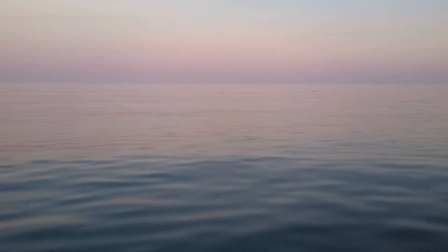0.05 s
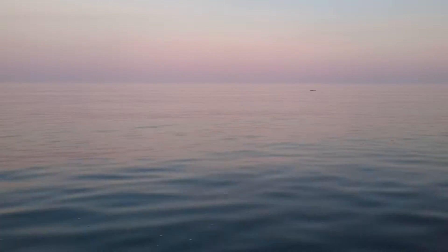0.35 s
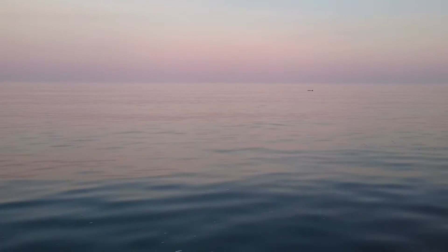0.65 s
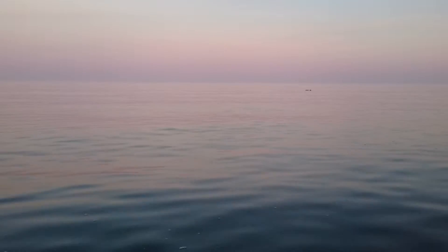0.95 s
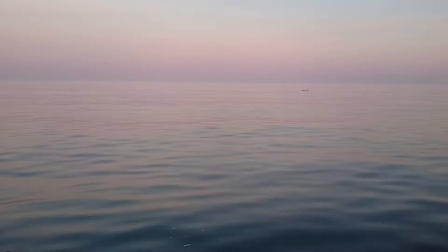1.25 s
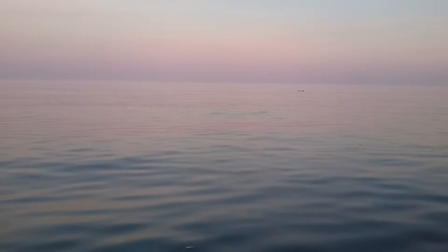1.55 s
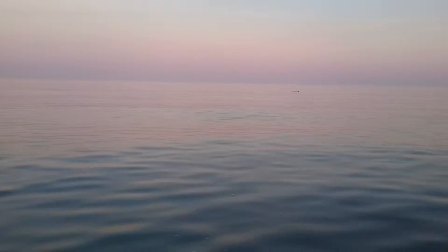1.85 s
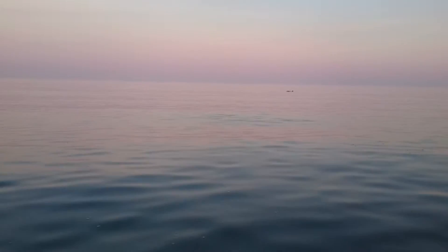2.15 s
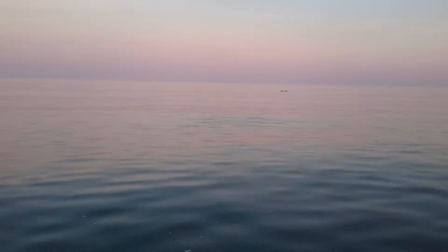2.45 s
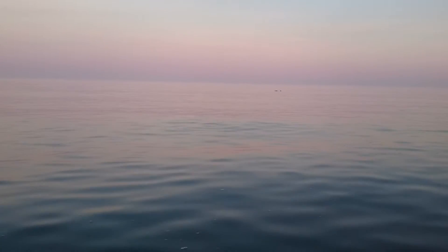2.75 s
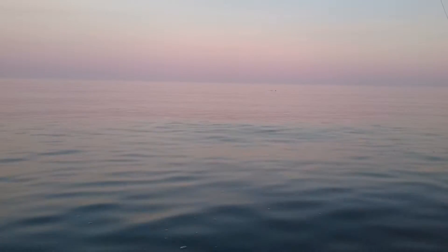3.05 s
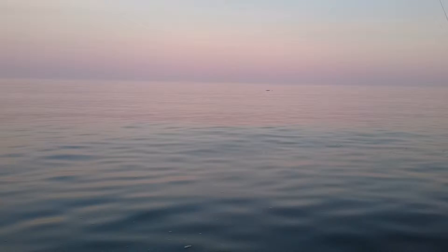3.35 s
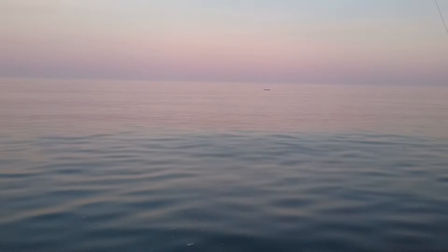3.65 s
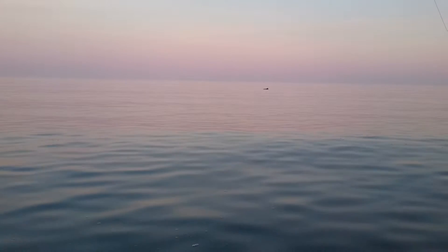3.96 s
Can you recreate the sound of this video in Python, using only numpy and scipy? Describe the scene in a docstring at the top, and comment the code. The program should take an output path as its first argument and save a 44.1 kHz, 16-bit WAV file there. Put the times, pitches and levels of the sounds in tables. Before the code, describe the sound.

A small sea wave washes ashore, fizzing on the left and fading after about 0.6 seconds. From around 1 second the wash runs on toward the right, gurgling and crackling with a fine foam hiss, fullest between 1.3 and 2.3 seconds, then slowly ebbing until 4 seconds. Single bubbles plop and droplets tick throughout, over a faint distant rumble with a few soft, low bumps.

```python
"""A small wave fizzes out on the left, on the shore of a calm sea; its wash runs on to the right,
gurgling and slowly ebbing. Each wash is a swarm of ringing bubbles on a bed of noise: large ones
gurgle, smaller ones crackle, the finest hiss as foam. Single bubbles plop and droplets tick over a
faint, distant rumble with a few soft bumps.
The two microphone channels are of opposite polarity, so the bass is very wide."""
import sys
import numpy as np
from scipy import signal
from scipy.fft import rfft, irfft, next_fast_len
from scipy.io import wavfile
from scipy.ndimage import uniform_filter1d, map_coordinates

SR = 44100
rng = np.random.default_rng(int(sys.argv[2]) if len(sys.argv) > 2 else 0)


def bounce(signal):
    """Save signal as a 16-bit WAV file at the path given by the first command-line argument."""
    frames = np.transpose(np.atleast_2d(signal))
    limited = np.clip(frames, -1, 1)
    pcm = np.round(limited * 32767).astype(np.int16)
    wavfile.write(sys.argv[1], SR, pcm)


N = 176400

# colour of the right wash at the microphones (frequency [Hz], left gain [dB], right gain [dB])
RIGHT_COLOUR = [(99, -47, -38), (333, -10.5, -12.5), (557, 2, -4.5), (1013, -3, -4), (1210, -10, -5.5),
                (1830, -14, -5.5), (2190, -10.5, -12), (3000, -18.5, -15), (3740, -16.5, -14.5),
                (4100, -27.5, -20), (5050, -36, -20.5), (6120, -32, -14), (9150, -36, -27),
                (11900, -47, -40), (13000, -39, -41), (15200, -48, -38.5)]
# direction of the right wash (frequency [Hz], phase lead of the left channel [rad])
RIGHT_LEAD = [(100, 2), (450, 3.5), (700, 1), (1000, -0.83), (1400, -2.5), (1750, -6.5), (2400, -9),
              (3000, -13.5), (4000, -14.5)]
# likeness of the two channels in the right wash (frequency [Hz], coherence [0-1])
RIGHT_COHERENCE = [(300, 0.78), (900, 0.79), (1400, 0.85), (2000, 0.32), (4000, 0.34), (6000, 0.041)]


def left_wash():
    """On the left a wave has tipped over: dense small bubbles swell, hold and fizz out."""
    # colour at the microphones (frequency [Hz], left gain [dB], right gain [dB])
    colour = [(97, -23.5, -18.5), (304, -8.5, -6.5), (597, -2, -5.5), (870, -9, -3), (1290, -6, -2),
              (1790, 0, -5), (2300, -3.2, -5), (2710, -3.5, -12), (3810, -6, -12), (5200, -26.5, -14),
              (5970, -26.5, -9.5), (8360, -29, -20), (11560, -44.5, -37.5), (15500, -45, -37.5)]
    # direction (frequency [Hz], phase lead of the left channel [rad])
    lead = [(100, 3), (450, 3.4), (850, 0.62), (1300, 0.23), (1900, 1.32), (2500, 2.32), (4000, 2.63),
            (6000, 7.75)]
    # likeness of the two channels (frequency [Hz], coherence [0-1])
    coherence = [(300, 0.95), (1000, 0.73), (2400, 0.69), (3200, 0.29), (4200, 0.66), (7000, 0.066)]
    crest_db, rise_db, crest_s, hold_s, fall_db_per_s = -40, 1.5, 0.23, 0.36, 8.5
    t = np.arange(N) / SR
    swell_db = -rise_db * np.maximum(1 - t / crest_s, 0)
    fade_db = -fall_db_per_s * np.maximum(t - crest_s - hold_s, 0)
    bubbles = froth(hz=(504, 9030), cycles=14, spread_db=3.8, rise=0.035, noise_db=6, count=7000, size=200)
    fizz = placed(patchy(bubbles, depth_db=0.9), colour, lead, coherence)
    return amp(crest_db + swell_db + fade_db) * (fizz + amp(-23) * tinkle())


def right_wash():
    """The wash runs on along the shore: gurgle in the lows, spray in the middle, foam on top."""
    # spray and foam run out to the right, then drift back (time [s], left minus right [dB])
    drift = [(0, 1), (2, 0.5), (2.5, -1.5), (2.8, -0.5), (3.3, 1), (3.9, 1)]
    gurgle_top_hz, foam_from_hz = 1050, 4650
    low = lambda hz: np.sqrt(rolloff(hz, gurgle_top_hz))
    high = lambda hz: np.sqrt(1 - rolloff(hz, foam_from_hz))
    middle = lambda hz: np.sqrt(np.abs(1 - low(hz) ** 2 - high(hz) ** 2))
    return gurgle(low) + panned(curve(drift)) * (spray(middle) + foam(high))


def gurgle(band):
    """Large bubbles gurgle, bright as the wash runs up and deeper as it ebbs."""
    # swell and ebb of the gurgle (time [s], level [dB])
    level = [(0, -54.5), (.4, -56), (.9, -52), (1.25, -48), (1.43, -46.5), (1.58, -49.5), (1.85, -48.5),
             (1.93, -48.5), (2.02, -44.5), (2.1, -46), (2.2, -47.5), (2.45, -48.5), (2.8, -50), (3, -50),
             (3.25, -51), (3.6, -50.5), (3.76, -51.5), (3.86, -53.5), (4, -54.5)]
    # extra gain on its smaller bubbles (time [s], gain [dB])
    brightness = [(0, 5), (1, -4), (1.7, 4.6), (2.4, 0.5), (3.6, -3.3)]
    large = froth(hz=(439.6, 1440), cycles=14.6, spread_db=1.5, rise=0.23, noise_db=0,
                  count=1400, size=1500)
    bubbling = on_right(large, band)
    upper = filtered(bubbling, lambda hz: 1 - rolloff(hz, corner_hz=950))
    lower = bubbling - upper
    return amp(curve(level) + 0.26 * wobble(21.9)) * (lower + amp(curve(brightness)) * upper)


def spray(band):
    """Smaller bubbles crackle in clouds, and a few tinkle on."""
    # surges of the spray (time [s], level [dB])
    level = [(0, -54), (.25, -46.5), (.55, -52.5), (.9, -49.5), (1.2, -47), (1.55, -46.5), (1.85, -48),
             (2, -47), (2.22, -48), (2.4, -50), (2.65, -50.5), (2.9, -51.5), (3.25, -51), (3.35, -49),
             (3.63, -51.5), (3.78, -54), (4, -52.5)]
    small = froth(hz=(1005, 4410), cycles=16.3, spread_db=-0.5, rise=0.14, noise_db=3,
                  count=2000, size=450)
    crackle = on_right(patchy(small, depth_db=1.2), band)
    return amp(curve(level) + 0.29 * wobble(22.7)) * (crackle + amp(-14.5) * tinkle())


def foam(band):
    """The finest bubbles merge into a hiss."""
    # surges of the hiss (time [s], level [dB])
    level = [(0, -57.5), (1.25, -62), (1.55, -55.5), (1.9, -57), (2.12, -57), (2.2, -55), (2.29, -57.5),
             (2.45, -58.5), (2.62, -60), (2.74, -60), (2.85, -61), (3.26, -61.5), (3.33, -58), (3.42, -60),
             (3.66, -60), (3.76, -62.5), (4, -62)]
    finest = froth(hz=(4050, 11000), cycles=23, spread_db=2.5, rise=0.089, noise_db=1,
                   count=4000, size=200)
    hiss = on_right(patchy(finest, depth_db=1.0), band)
    return amp(curve(level) + 0.92 * wobble(25.14)) * hiss


def plops():
    """Single bubbles ring out; they reach the left microphone later, with opposite sign."""
    # (time [s], level [dB], pitch [Hz], ring [cycles], left minus right [dB], left lag [s])
    bubbles = [(0.339, -28, 1840, 23, 0, 0.0002), (0.932, -27, 1910, 30, -1, 0.00021),
               (1.001, -32.5, 916, 43, 1, 0.00047), (1.199, -24.5, 990, 12, -2, .00045),
               (1.208, -33, 2370, 40, 1, 0.0005), (1.406, -31, 510, 20, 4, 0.00047),
               (1.881, -26.5, 930, 21, 3, .00059), (1.951, -33, 590, 26, 6, 0.00062),
               (1.953, -33, 1850, 40, 0, 0.00035), (1.978, -31, 990, 22, 1, .00059),
               (2.011, -33.5, 1016, 64, 0, 0.00051), (2.193, -31, 534, 29, 4, 0.00046),
               (2.384, -35, 540, 27, 2, .0004), (2.545, -33, 780, 25, 8, .00055),
               (2.721, -33, 950, 17, 2, .00062), (2.856, -32, 1190, 16, -4, .00064),
               (3.113, -38.5, 620, 29, 7, 0.00054), (3.312, -29, 1020, 22, -2, 0.00056),
               (3.517, -36, 2430, 40, 0, 0.0004), (3.553, -34, 707, 27, 4, 0.00044),
               (3.654, -36.5, 705, 22, 10, .00046), (3.761, -39, 610, 22, 7, 0.00046),
               (3.922, -44, 2260, 140, -2, 0.00031)]
    trim_db = -3
    out, t = np.zeros((2, N)), np.arange(SR // 12) / SR
    for start, db, hz, cycles, pan_db, lag_s in bubbles:
        left, right = panned(pan_db) * amp(db + trim_db) * bubble(t, hz, cycles, rise=0.036)
        add(out[0], start + lag_s, -left)
        add(out[1], start, right)
    return out


def droplets():
    """Droplets strike the water with a short, bright burst in the colour of the right wash."""
    # (time [s], level [dB], band centre [Hz], time to fall 60 dB [s], left minus right [dB])
    strikes = [(.6, -41, 5300, .026, 4), (.632, -27, 3000, 0.019, 8), (.72, -32.5, 4800, .026, 3),
               (0.888, -32, 4600, 0.016, -2), (1.185, -38.5, 3860, .08, 1), (1.203, -31.5, 1590, .08, 5),
               (1.42, -33.5, 1110, 0.17, 0), (1.545, -45, 7000, .04, -3), (2.139, -32, 2800, .02, 3),
               (2.208, -41, 6500, 0.056, 0), (2.44, -39.5, 3000, 0.047, -6), (2.547, -31, 1900, 0.018, -5),
               (2.752, -41, 4000, .04, 0), (2.95, -40, 3020, .045, -5), (3.117, -38.5, 4200, .022, -4),
               (3.311, -40.5, 5000, 0.031, -4), (3.349, -46, 4800, .08, 0), (3.659, -43.5, 4500, .035, 0),
               (3.736, -38.5, 3500, .02, 9), (3.847, -38.5, 2900, .022, 4)]
    width_octaves = 0.7
    out, t = np.zeros((2, N)), np.arange(SR // 8) / SR
    hz = np.fft.rfftfreq(len(t), 1 / SR)
    colour = channel_gains(RIGHT_COLOUR, hz)
    for start, db, centre_hz, t60, pan_db in strikes:
        band = colour * np.exp(-(np.log2((hz + 1) / centre_hz) / width_octaves) ** 2 / 2)
        noise = rng.standard_normal((2, len(t)))
        burst = unit(irfft(rfft(noise) * band, len(t)))
        envelope = (1 - np.exp(-t * centre_hz)) * amp(db - 60 * t / t60)
        add(out, start, panned(pan_db) * burst * envelope / 2)
    return out


def tinkle():
    """A few small bubbles ring on clearly, at rms 1."""
    rings = froth(hz=(1600, 4210), cycles=120, spread_db=1, rise=0.067, noise_db=-36, count=70, size=3500)
    return on_right(rings)


def bumps():
    """A few soft, low bumps, the same in both channels."""
    # (time [s], strength [dB], pitch [Hz])
    thuds = [(0.412, -39, 70), (1.345, -40, 62), (2.028, -37, 144), (3.186, -42, 65)]
    t60_s = 0.018
    out, t = np.zeros((2, N)), np.arange(SR // 10) / SR
    for start, db, hz in thuds:
        add(out, start, amp(db) * bubble(t, hz, cycles=t60_s * hz, rise=0))
    return out


def rumble():
    """A steady rumble in the distance, mostly of opposite sign in the two channels."""
    # (frequency [Hz], relative spectral level [dB])
    spectrum = [(20, -15), (40, -13), (57, 1), (75, -2), (110, -9.5), (170, -14.5), (300, -13), (900, -53)]
    level_db, coherence = -60, 0.89
    opposed, alike = filtered(rng.standard_normal((2, N)), lambda hz: amp(along(spectrum, hz)))
    angle = np.arccos(coherence) / 2
    return amp(level_db) * unit(np.sin(angle) * alike + np.cos(angle) * np.array([opposed, -opposed]))


def bubble(t, hz, cycles, rise):
    """A damped ring that falls 60 dB in so many cycles while its pitch climbs by the fraction rise."""
    age = t * hz / cycles
    onset = 1 - np.exp(-2 * t * hz)
    return np.sin(2 * np.pi * hz * t * (1 + rise * age / 2)) * amp(-60 * age) * onset


def froth(hz, cycles, spread_db, rise, noise_db, count, size):
    """Two unrelated swarms of bubbles, size samples each, on noise (noise_db compares the two per Hz)."""
    low_hz, high_hz = hz
    swarms = []
    for when, pitch, rarity in rng.random((2, 3, count, 1)):
        ring_hz = low_hz + (high_hz - low_hz) * pitch
        strength = np.sqrt(ring_hz) * amp(-spread_db * np.log(np.maximum(rarity, .02)))
        sign = rng.choice([-1, 1], (count, 1))
        rings = sign * strength * bubble(np.arange(size) / SR, ring_hz, cycles, rise)
        samples = (when * N).astype(int) + np.arange(size)
        swarms.append(np.bincount(samples.ravel(), rings.ravel(), N)[:N])
    band_share = (high_hz - low_hz) / (SR / 2)
    return unit(np.array(swarms)) * np.sqrt(band_share) + amp(noise_db) * rng.standard_normal((2, N))


def patchy(pair, depth_db):
    """Bubbles come in clouds: patches of random gain over pitch and time."""
    spectra = signal.stft(pair, nperseg=512)[2]
    clouds = uniform_filter1d(rng.standard_normal(spectra.shape[1:]), size=7, axis=0)
    clouds = uniform_filter1d(clouds, size=9, axis=1)
    return signal.istft(spectra * amp(depth_db * unit(clouds)), nperseg=512)[1][:, :N]


def placed(pair, colour, lead, coherence, band=np.ones_like):
    """Give two unrelated signals the colour, direction and width of a wash at the microphones, rms 1."""
    def width(hz):
        angle = np.arccos(np.clip(along(coherence, hz), 0, 1)) / 2
        return band(hz) * np.array([np.cos(angle), np.sin(angle)])

    def arrival(hz):
        return channel_gains(colour, hz) * np.exp(np.outer([.5j, -.5j], along(lead, hz)))

    mid, side = filtered(pair, width)
    return unit(filtered(np.array([mid + side, mid - side]), arrival))


def on_right(pair, band=np.ones_like):
    """Place a pair of signals in the right wash."""
    return placed(pair, RIGHT_COLOUR, RIGHT_LEAD, RIGHT_COHERENCE, band)


def channel_gains(colour, hz):
    """Left and right gains from a colour table."""
    return amp([along(colour, hz, column=1), along(colour, hz, column=2)])


def panned(pan_db):
    """Gains of the two channels for a left minus right level."""
    return amp(np.array([[.5], [-.5]]) * pan_db)


def amp(db):
    """Decibels to gain."""
    return 10 ** (np.asarray(db) / 20)


def unit(x):
    """Scale to rms 1."""
    return x / np.sqrt(np.mean(x ** 2) + 1e-20)


def along(rows, hz, column=1):
    """One column of a table, read on a log frequency axis."""
    table = np.transpose(rows)
    return np.interp(np.log(hz + 1), np.log(table[0] + 1), table[column])


def curve(rows):
    """(time [s], value) rows as one value per sample."""
    return np.interp(np.arange(N) / SR, *np.transpose(rows))


def wobble(rate):
    """A smooth random curve, rate knots a second."""
    return map_coordinates(rng.standard_normal(1024), [np.arange(N) * rate / SR], mode="mirror")


def rolloff(hz, corner_hz):
    """A steep low-pass shape, one half at the corner."""
    return 1 / (1 + (hz / corner_hz) ** 10)


def filtered(x, response):
    """Filter x by a complex response of frequency."""
    size = next_fast_len(N + 8192)
    return irfft(rfft(x, size) * response(np.fft.rfftfreq(size, 1 / SR)), size)[..., :N]


def add(out, start_s, sound):
    """Mix a short sound in at its start time."""
    part = out[..., round(start_s * SR):][..., :sound.shape[-1]]
    part += sound[..., :part.shape[-1]]


def scene():
    """The shore: both washes with their plops and droplets, over the bumps and the distant rumble."""
    return left_wash() + right_wash() + plops() + droplets() + bumps() + rumble()


def record(dry):
    """The recorder keeps nothing above its band limit."""
    top_hz = 15700
    return filtered(dry, lambda hz: hz < top_hz)


dry = scene()
out = record(dry)
bounce(out)
```